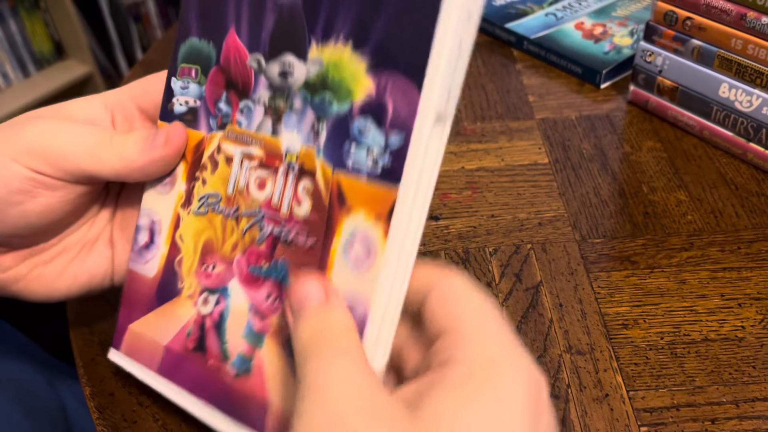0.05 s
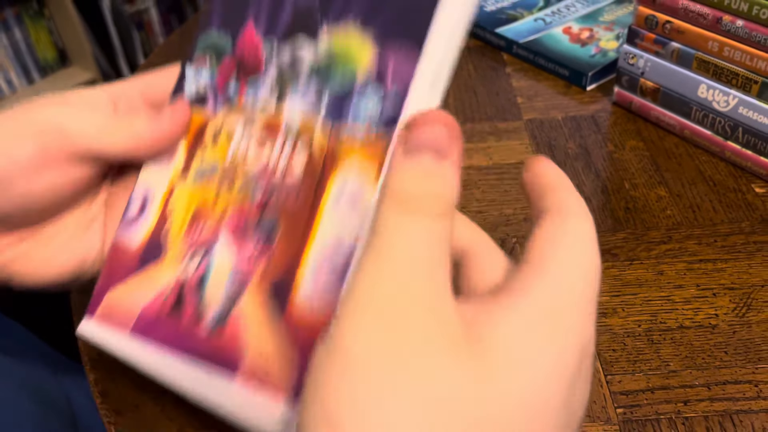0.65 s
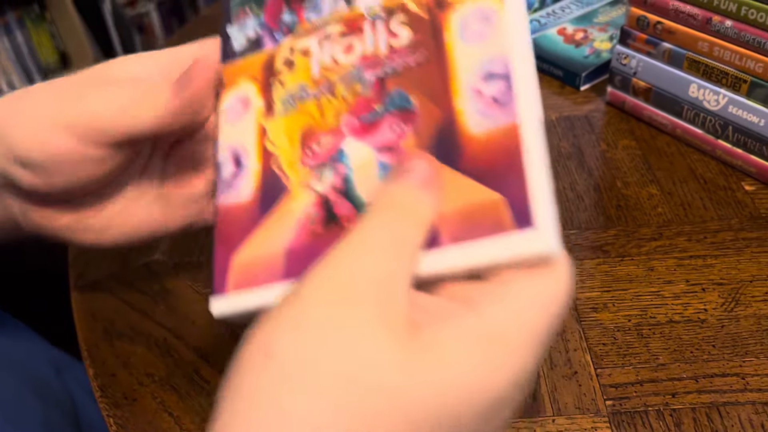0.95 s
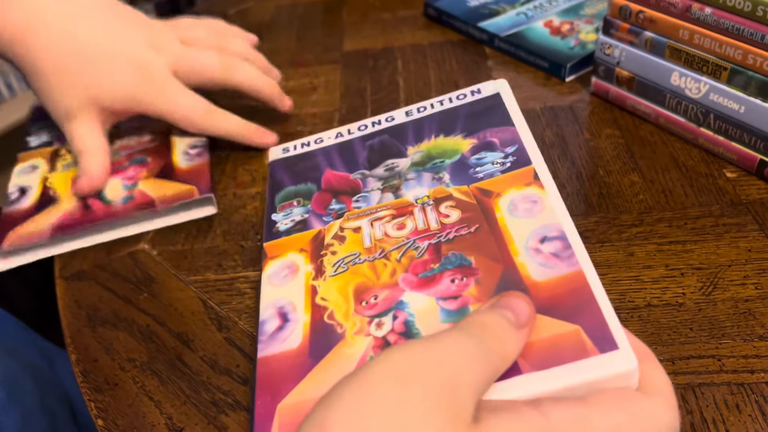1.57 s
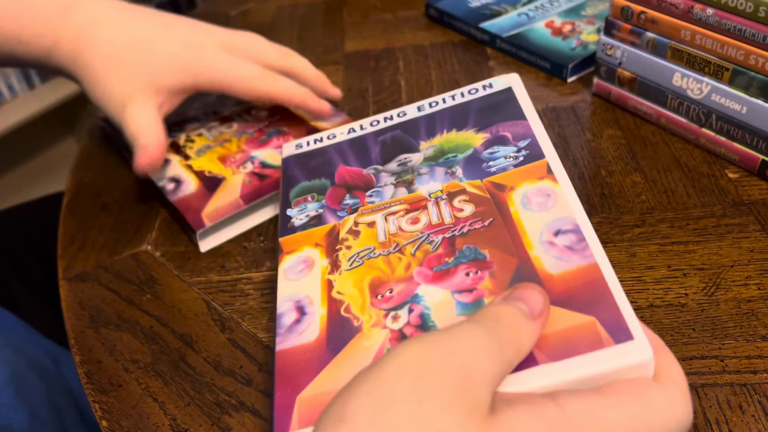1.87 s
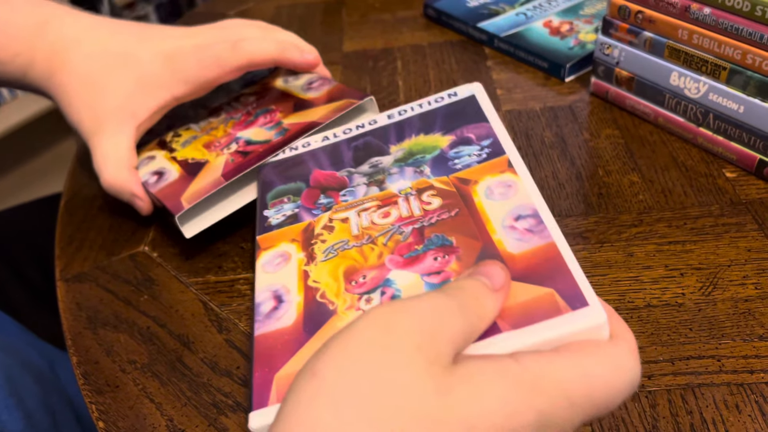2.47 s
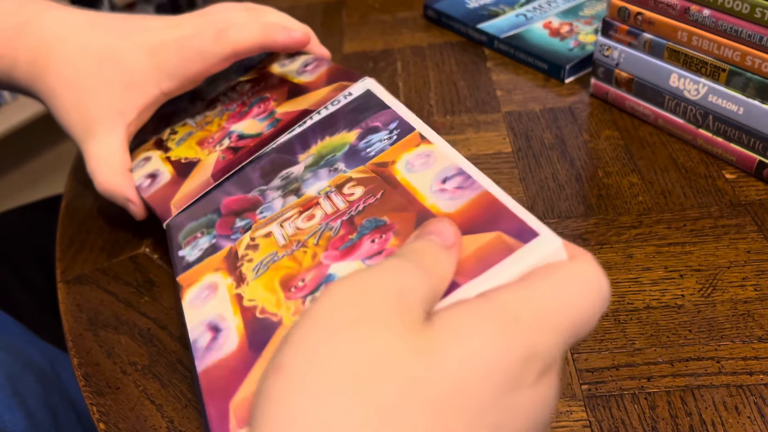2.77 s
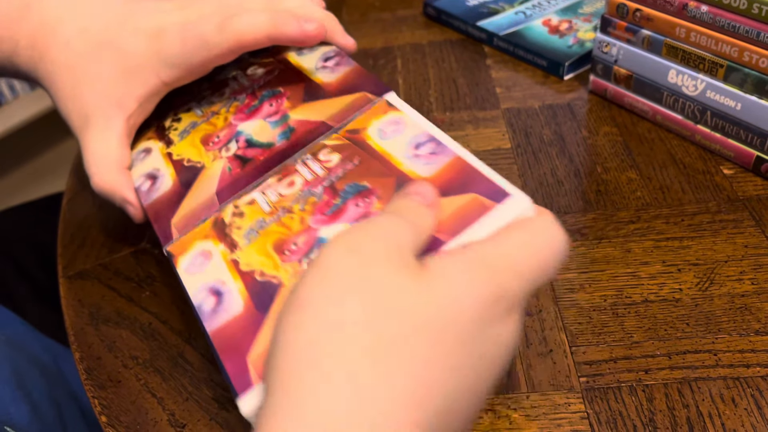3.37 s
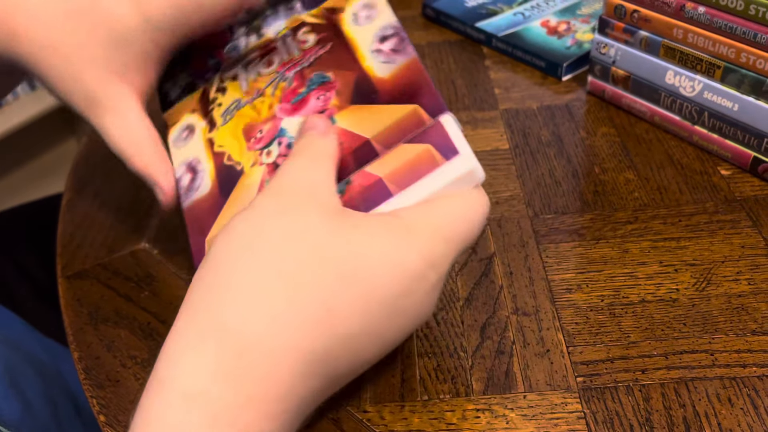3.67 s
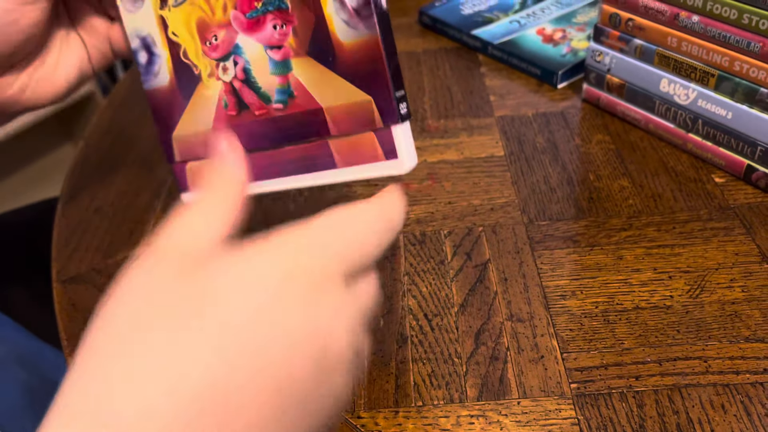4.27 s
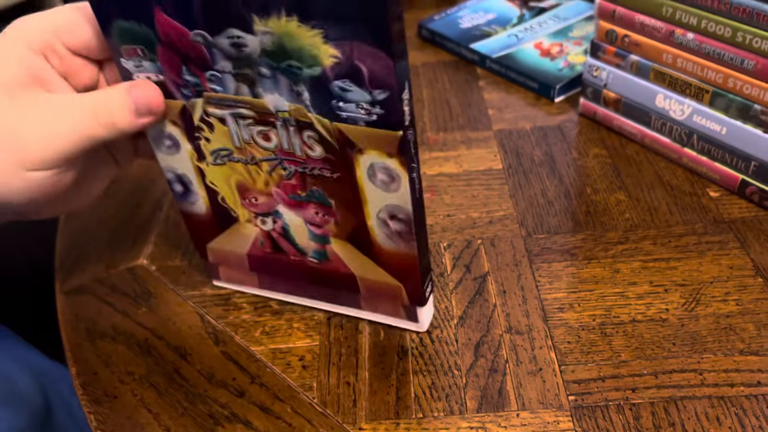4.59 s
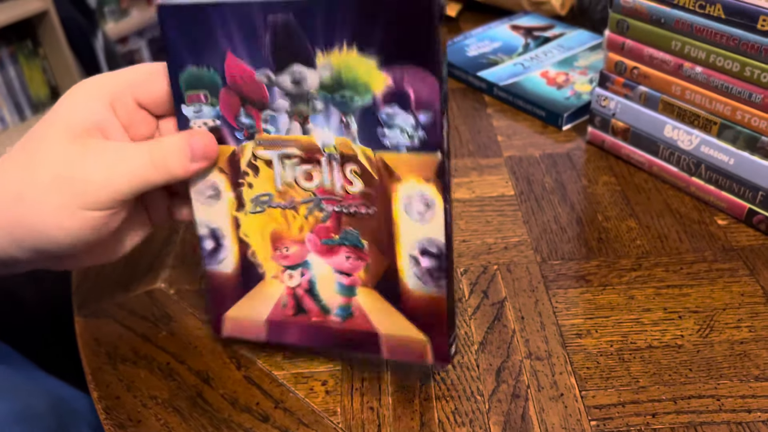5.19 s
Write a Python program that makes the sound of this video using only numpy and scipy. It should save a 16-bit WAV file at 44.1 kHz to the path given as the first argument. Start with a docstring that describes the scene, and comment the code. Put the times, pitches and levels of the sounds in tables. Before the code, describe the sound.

A plastic case snaps shut, is handled with light scrapes and squeaks, then another clacks onto a wooden table over a low hum.

```python
"""Two plastic disc cases are handled over a wooden table, close by, in a small humming room.
One snaps shut, the other is dragged across the wood; they rub and squeak on each other, then one is
knocked upright, slips and clacks into place. Impacts excite the damped modes of shells, edges and
table; sliding friction drives the shells with many tiny slips, and stick-slip oscillation squeaks.
Short reflections follow the handling, over the hum and air flow of fan motors."""
import sys
import numpy as np
from scipy import signal
from scipy.fft import rfft, irfft, next_fast_len
from scipy.io import wavfile
from scipy.ndimage import uniform_filter1d, map_coordinates

SR = 44100
rng = np.random.default_rng(int(sys.argv[2]) if len(sys.argv) > 2 else 0)


def store_pcm(level_fs):
    """Save levels as 16-bit WAV."""
    pcm = np.round(np.clip(level_fs, -1, 1) * 32767).astype(np.int16)
    wavfile.write(sys.argv[1], SR, np.atleast_2d(pcm).T)


N = 239621
T = np.arange(N) / SR
HIT_SIZE = 8192  # samples in one short event
LEFT_RIGHT = np.array([[1], [-1]])

# modes of the first case's stiff edge, in blows and taps: f/Hz, bandwidth/Hz, gain/dB
FIRST_EDGE_MODES = [(2980, 830, 3), (3940, 520, 0), (5040, 440, -15), (5800, 870, -5.5), (8000, 550, 3),
                    (8200, 440, -6.5), (11500, 1900, -21.5), (15100, 2000, 4.5)]
# modes of the rubbed case wall: f/Hz, bandwidth/Hz, gain/dB
WALL_MODES = [(870, 330, -13.5), (1400, 850, -13.5), (1670, 260, 5), (2000, 160, 6), (2270, 240, -7),
              (2535, 73, 3), (3300, 560, -22)]


def undb(db):
    """Amplitude ratio of a level in decibels."""
    return 10 ** (np.asarray(db) / 20)


def unit(x):
    """Normalisation to rms 1."""
    return x / np.sqrt(np.mean(x ** 2))


def peak(x, db):
    """Normalisation to a peak level."""
    return x * undb(db) / np.abs(x).max()


def freqs(size):
    """Bin frequencies of a Fourier transform, kept above zero."""
    return np.maximum(np.fft.rfftfreq(size, 1 / SR), 1)


def along(f, hz, values):
    """Linear interpolation on a log-frequency axis."""
    return np.interp(np.log(f), np.log(hz), values)


def colour(x, points):
    """Zero-phase filtering by a curve of (f/Hz, gain/dB) points."""
    size = x.shape[-1]
    return irfft(rfft(x) * undb(along(freqs(size), *np.transpose(points))), size)


def ring(x, modes):
    """Modal superposition: x drives damped resonators (f/Hz, bandwidth/Hz, gain/dB)."""
    size = x.shape[-1]
    f = freqs(size)
    response = sum(undb(db) / (1 + 1j * (f * f - hz * hz) / (f * width)) for hz, width, db in modes)
    return irfft(rfft(x) * response, size)


def walk(rate, size):
    """Smooth random drift with a spread near 1 and `rate` new values a second."""
    step = max(int(SR / rate), 1)
    stairs = np.repeat(rng.standard_normal(size // step + 1), step)
    return 1.2 * uniform_filter1d(stairs, step)[:size]


def widen(mid, side, side_curve):
    """Sum and difference stereo; the difference has its own spectrum."""
    return mid + LEFT_RIGHT * colour(side, side_curve)


def pan(db):
    """Channel gains for a level difference, left minus right."""
    return undb(LEFT_RIGHT * db / 2)


def add(out, s, sound):
    """Superposition of a sound beginning at s seconds."""
    i = max(int(s * SR), 0)
    out[:, i:i + sound.shape[-1]] += sound[..., :N - i]


def fans(air_db=-45, whistle_db=-73, waver_db=0.73, drift_hz=0.44):
    """Fan motors give a line spectrum over the continuous spectrum of flowing air."""
    # moving air: f/Hz, gain/dB
    air_spectrum = [(25, -19), (55, 0.5), (85, -2), (150, 0.5), (275, 2), (360, -11.5), (500, -13),
                    (800, -18.5), (1650, -18.5), (2900, -37.5), (4000, -46.5), (5600, -64), (9000, -62.5),
                    (16000, -83)]
    # whistles in the flow: f/Hz, bandwidth/Hz, gain/dB
    whistle_modes = [(3670, 910, 2), (4495, 75, 6), (7070, 720, 3.5)]
    # motor and mains hum: f/Hz, rms level/dB
    hum_lines = [(59.5, -96), (139.5, -52), (180.3, -55), (240, -47.5), (253.5, -53), (267.5, -49.5),
                 (360.5, -67.5), (468, -68), (535, -91.5)]
    flow = colour(rng.standard_normal((2, N)), air_spectrum)
    whistle = ring(rng.standard_normal((2, N)), whistle_modes)
    whistle = colour(whistle, [(1500, -7.5), (3500, 12.5), (7500, -3.0), (11000, -15.5)])
    mid, side = undb(air_db) * unit(flow) + undb(whistle_db) * unit(whistle)
    air = widen(mid, side, [(60, -16.5), (250, -8.0), (500, -5.0), (1200, 0.5), (5000, -0.5)])
    hum = 0
    for hz, db in hum_lines:
        phase = 2 * np.pi * (np.cumsum(hz + drift_hz * walk(2.924, N)) / SR + rng.random())
        hum = hum + np.sqrt(2) * undb(db + waver_db * walk(3.7, N)) * np.sin(phase)
    return (air + hum) * pan(db=1)


def friction(hiss, rasp, modes, slips_per_s, scatter_db, uneven_db, side_db, drift):
    """Friction as shot noise: tiny slips hiss at the surface and excite a rasp in the shell's modes."""
    # hiss of the sliding surfaces: f/Hz, gain/dB
    hiss_spectrum = [(700, 4), (1500, 2.5), (2800, 8), (4500, -1), (6500, -2), (8500, -2), (10500, -24),
                     (13000, -42), (15300, 3.5), (17000, -27)]
    size = next_fast_len(N, True)
    slips = (rng.random((4, size)) < slips_per_s / SR) * rng.standard_normal((4, size))
    strength_db = scatter_db * np.minimum(rng.exponential(size=(4, size)), 4)
    slips = slips * undb(strength_db + uneven_db * walk(160, size))
    surface = unit(colour(slips[:2], hiss_spectrum))[:, :N]
    wall = colour(ring(slips[2:], modes), [(300, -19), (800, 3.0), (4700, -4.5), (9000, -22.5)])
    # the resonances wander as the contact moves
    warped_index = np.cumsum(1 + drift * walk(25, N))
    wall = np.array([map_coordinates(w, [warped_index], order=2, mode="mirror") for w in wall])
    mid, side = hiss * surface + rasp * unit(wall)
    return mid + LEFT_RIGHT * undb(side_db) * side


def rub(grip_hiss_db=-79, grip_rasp_db=-66, wander_db=1.8, press_db=7, rise_share=0.37, stop_s=.021):
    """Friction of shifting fingers and brief rubs: noise grows with speed, rasp also with pressure."""
    # short rasping tail of the snap, then brief rubs of case on case:
    # t/s, duration/s, hiss level/dB, rasp reference level/dB
    rasps = [(0.38, 0.047, -57, -44), (0.834, 0.11, -71.5, -57), (2.51, 0.068, -73, -51),
             (2.558, 0.079, -59, -45), (2.723, 0.045, -60, -43), (3.11, 0.16, -69, -53),
             (3.655, 0.061, -83, -57), (4.656, 0.12, -57, -40)]
    grip = undb(wander_db * walk(rate=3.9, size=N))
    hiss, rasp = undb(grip_hiss_db) * grip, undb(grip_rasp_db) * grip
    for s, length, hiss_db, rasp_db in rasps:
        age = T - s
        rise = np.clip(age / (rise_share * length), 0, 1) ** 2
        speed = rise * np.exp(-np.maximum(age - length, 0) / stop_s)
        pressure = np.clip(age / length, 0, 1)
        hiss = np.hypot(hiss, speed * undb(hiss_db))  # incoherent sources add in power
        rasp = np.hypot(rasp, speed * undb(rasp_db - press_db * (1.5 - pressure)))
    return friction(hiss, rasp, WALL_MODES,
                    slips_per_s=7400, scatter_db=2.3, uneven_db=1.5, side_db=-1.5, drift=.04)


def taps(side_db=-7, crackle_db=4):
    """Transient excitation: a glancing touch is a crackling noise burst that rings cover and edge."""
    # touches of fingers and edges: t/s, brush time/s, shell level/dB, tick level/dB, low-pass f/Hz
    touches = [(0.039, 0.0023, -37, -60, 2600), (0.594, 0.0034, -51, -39, 2600),
               (0.715, 0.0017, -37.5, -68, 1400), (0.881, .003, -36, -70, 1500),
               (0.932, 0.0014, -42, -36.5, 3000), (.949, .003, -43, -72, 1200),
               (1.005, 0.0054, -39, -39, 2200), (1.042, .0025, -33, -71, 1500),
               (1.094, 0.0043, -38.5, -68, 2000), (1.230, .002, -35, -74, 900),
               (1.246, 0.0051, -30, -66, 1100), (1.511, 0.0023, -47, -41, 2600),
               (1.581, .0015, -39.5, -46, 3000), (2.6492, 0.0011, -20, -35, 2600),
               (2.663, 0.0027, -27, -42, 2600), (3.681, .0022, -38, -58, 2600),
               (4.165, 0.0018, -60, -43.5, 2600), (5.208, 0.0029, -39, -68, 2600)]
    # modes of the lightly touched cover: f/Hz, bandwidth/Hz, gain/dB
    cover_modes = [(704, 200, -7), (1110, 88, 8), (1320, 420, 9), (1710, 140, 3.5), (2600, 220, 0),
                   (3150, 250, -27)]
    out, t = np.zeros((2, N)), np.arange(HIT_SIZE) / SR
    for s, brush_s, shell_db, tick_db, soft_hz in touches:
        envelope = undb(crackle_db * walk(700, HIT_SIZE)) * t * np.exp(-t / brush_s)
        mid, side = rng.standard_normal((2, HIT_SIZE)) * envelope
        scuff = mid + LEFT_RIGHT * undb(side_db) * side
        touch = peak(ring(scuff, cover_modes), shell_db) + peak(ring(scuff, FIRST_EDGE_MODES), tick_db)
        softness = signal.butter(1, soft_hz, fs=SR, output="sos")
        add(out, s, signal.sosfilt(softness, touch) * (1 - t / t[-1]))
    return out


def disperse(x, corner_hz=1300):
    """Dispersion of bending waves, as an all-pass filter: low frequencies arrive after high ones."""
    _, poles = signal.butter(4, corner_hz, fs=SR)
    return signal.lfilter(poles[::-1], poles, x)


def blow(shell_modes, edge_modes, shell_db, contact_hz, bass_hz, thump_db, tick_db, pan_db, lag_ms,
         pitch, contact_s=.001, chatter=0.1, tick_side=0.16, table_lag_s=0.00269):
    """Impact: a short force pulse sets shell and table in free vibration while the edges crack."""
    # slow flexural modes of the table: f/Hz, bandwidth/Hz, gain/dB
    table_modes = [(120, 29, -9), (180, 21, 5.5), (224, 47, 12), (376, 23, -7)]
    t = np.arange(HIT_SIZE) / SR
    noise = rng.standard_normal((4, HIT_SIZE))
    contact = np.exp(-t / contact_s)
    force = (t == 0) + chatter * noise[:2] * np.sqrt(contact)
    # a softer contact lasts longer and leaves the high modes quiet
    force = signal.sosfilt(signal.butter(2, contact_hz, fs=SR, output="sos"), force)
    shell = disperse(ring(force, np.array(shell_modes) * [pitch, 1, 1]))
    # a blow near a stiff edge moves less of the panel and radiates less bass
    shell = signal.sosfilt(signal.butter(2, bass_hz, "high", fs=SR, output="sos"), shell)
    crack = (noise[2] + tick_side * LEFT_RIGHT * noise[3]) * contact
    thump = np.roll(ring(force.mean(0), table_modes), int(table_lag_s * SR))
    sound = peak(shell, shell_db) + peak(thump, thump_db) + peak(ring(crack, edge_modes), tick_db)
    sound[1] = np.roll(sound[1], round(lag_ms * SR / 1000))
    fade = np.cos(np.pi / 2 * t / t[-1]) ** 2
    return sound * fade * pan(pan_db)


def snap_and_knocks():
    """Each struck case rings in its natural modes: one snaps shut, the other is stood on the table."""
    # the first case's catch closes at two points, the lid rattles, later an edge is knocked:
    # t/s, shell level/dB, contact low-pass f/Hz, bass cut f/Hz, thump level/dB, tick level/dB,
    # left minus right/dB, right lag/ms, shell frequency ratio
    snap = [ (0.3868, -6.5, 3300, 300, -33, -17.5, -2.5, .09, 1),
            (0.3882, -2.5, 3600, 300, -33, -11, -1, .09, 1),
            (0.3972, -34, 2200, 1500, -44, -43, 2, 0, 0.89),
            (0.3999, -17.5, 2000, 300, -36, -39, -9, .2, 1.4), (0.4060, -23, 1900, 400, -40, -41, 0, 0, .9),
            (0.9106, -26, 1500, 950, -48, -58, -4, 0.027, 1.16)]
    # the second case strikes the table and settles: same columns
    knocks = [ (4.5530, -0.3, 1930, 250, -12, -28, -4, 0.077, 0.96),
              (4.716, -27, 1300, 702, -38, -59, -2, 0, 1),
              (4.7341, -22, 5970, 1500, -33, -10.5, -6.5, 0, 1.4),
              (4.7365, -11.5, 2200, 500, -22.5, -11, 2, .02, 1.1),
              (4.778, -3.5, 1850, 1320, -28.5, -34, -4, .08, 1.06),
              (4.7915, -31, 1600, 1500, -40, -55, -1, 0, 1.3),
              (4.7985, -23, 1200, 800, -47, -57, -2, 0, 1.12)]
    # modes of the two hollow shells and the second case's stiff edge: f/Hz, bandwidth/Hz, gain/dB
    first_shell = [(250, 78, -10), (420, 120, -13), (580, 210, -1.5), (820, 250, 4), (1370, 240, 0.5),
                   (1864, 240, 4.5), (2220, 290, 0.5), (2800, 350, -21.5), (4100, 700, -9),
                   (5800, 1200, -25)]
    second_shell = [(524, 120, -10), (733, 94, 4.5), (807, 130, 0.5), (980, 190, -4.5), (1200, 130, -11),
                    (1400, 94, -9.5), (1843, 120, -8), (2230, 170, -12.5), (2935, 250, -28),
                    (3570, 320, -26.5), (4500, 600, -19.5)]
    second_edge = [(2730, 560, 1.5), (3670, 810, 5.5), (5070, 600, -17), (5780, 420, 3.5),
                   (6940, 530, -7.5), (7950, 420, -3), (8950, 320, -27), (11630, 1400, -34),
                   (15500, 2300, 0.5)]
    out = np.zeros((2, N))
    for s, *stroke in snap:
        add(out, s, blow(first_shell, FIRST_EDGE_MODES, *stroke))
    for s, *stroke in knocks:
        add(out, s, blow(second_shell, second_edge, *stroke))
    return out


def motion(curve):
    """Amplitude envelope through (t/s, level/dB) points, at rest before and after."""
    return undb(np.interp(T, *np.transpose(curve), left=-200, right=-200))


def drag(hiss_db=5.5, rasp_db=8):
    """Sliding friction on wood: a case lying flat catches on the grain, which excites its modes."""
    # speed of three shoves, as loudness: t/s, level/dB
    shoves = [(1.27, -78), (1.31, -69), (1.34, -57), (1.377, -69.5), (1.395, -61.5), (1.46, -65),
              (1.52, -68), (1.59, -70.5), (1.635, -81), (1.69, -68.5), (1.735, -66), (1.79, -71.5),
              (1.93, -83)]
    # modes of the second case lying flat: f/Hz, bandwidth/Hz, gain/dB
    flat_modes = [(1020, 140, -21), (1340, 230, 5), (1600, 250, -7), (2620, 210, 4.5), (3050, 220, -6),
                  (3780, 170, -5), (4530, 280, 2), (6200, 400, 3)]
    speed = motion(shoves)
    return friction(speed * undb(hiss_db), speed * undb(rasp_db), flat_modes,
                    slips_per_s=2200, scatter_db=1.0, uneven_db=2.5, side_db=-3, drift=.06)


def squeaks(overtone_db=-19, grit_hz=2900, grit_width_hz=1600, grit_per_roughness=2.03):
    """Stick-slip oscillation locks briefly onto a wall resonance; missed slips make it gritty."""
    # plastic squeaking on plastic or wood: t/s, duration/s, f/Hz, level/dB, roughness share
    chirps = [(1.297, .006, 3900, -54, 0.067), (1.318, .009, 2450, -54, 0.16),
              (1.347, .008, 3900, -53, 0.16), (1.399, 0.01, 2600, -56, 0.07),
              (1.437, 0.014, 4550, -54, 0.037), (1.449, 0.007, 3650, -51, 0.067),
              (1.508, 0.012, 6100, -53.5, .03), (2.648, 0.0094, 2030, -25, 0.049),
              (2.735, 0.041, 2080, -46.5, 0.106), (2.757, 0.0072, 2080, -33.5, 0.031),
              (2.768, 0.0075, 2060, -36, 0.035), (2.774, 0.0064, 2250, -41, .07)]
    out = np.zeros((2, N))
    for s, length, hz, db, roughness in chirps:
        size = int(length * SR)
        pitch_hz = hz * (1 + roughness * walk(1800, HIT_SIZE)[:size])
        phase = 2 * np.pi * np.cumsum(pitch_hz) / SR
        grit = unit(ring(rng.standard_normal((2, HIT_SIZE)), [(grit_hz, grit_width_hz, 0)]))[:, :size]
        tone = np.sin(phase) + undb(overtone_db) * np.sin(2 * phase)
        envelope = undb(db) * signal.windows.tukey(size, .7)
        add(out, s, (tone + grit_per_roughness * roughness * grit) * envelope * pan(db=-3))
    return out


def bumps():
    """Low-frequency flexure: a soft push makes the table swing for a few cycles."""
    # hand and case against the table: t/s, duration/s, f/Hz, peak level/dB
    nudges = [(3.135, 0.058, 64.8, -30), (3.198, 0.041, 99, -28.5)]
    out = np.zeros((2, N))
    for s, length, hz, db in nudges:
        t = np.arange(int(length * SR)) / SR
        add(out, s, undb(db) * np.sin(np.pi * t / length) * np.sin(2 * np.pi * hz * t))
    return out


def slide(hiss_db=6.5, midway_rasp_db=12, press_db_per_s=36.5):
    """Friction under a growing load: one case slides along the other, bright at first, then raspier."""
    # speed of the long slide, as loudness: t/s, level/dB
    stroke = [(3.2, -83), (3.27, -67), (3.34, -59), (3.45, -61.5), (3.58, -63), (3.61, -76), (3.65, -87)]
    speed = motion(stroke)
    start, end = stroke[0][0], stroke[-1][0]
    press_db = press_db_per_s * (np.clip(T, start, end) - (start + end) / 2)
    return friction(speed * undb(hiss_db), speed * undb(midway_rasp_db + press_db), WALL_MODES,
                    slips_per_s=2300, scatter_db=1.5, uneven_db=1.5, side_db=-3, drift=.025)


def room(x, first_s=0.0045, build_s=0.002):
    """Reverberation: diffuse reflections build within milliseconds, then decay exponentially."""
    # bands of the furnished room: f/Hz, T60/s, gain/dB
    bands = [(125, 0.1, -1), (250, 0.077, -6.5), (500, 0.13, -6), (1000, 0.22, -15.5), (1995, 0.18, -15.5),
             (4000, 0.13, -14), (8000, 0.18, -13.5), (14100, 0.13, -25)]
    size = SR // 2
    t, f = np.arange(size) / SR, freqs(size)
    mid, side = rng.standard_normal((2, size))
    spectrum = rfft(widen(mid, side, [(200, -12.0), (600, -11.5), (1500, -2)]))
    swell = np.clip((t - first_s) / build_s, 0, 1)
    tail = 0
    for share, (_, t60, db) in zip(np.eye(len(bands)), bands):
        fade = swell * undb(-60 * t / t60)
        band = irfft(spectrum * along(f, np.array(bands)[:, 0], share), size)
        tail = tail + undb(db) * band * fade / np.linalg.norm(fade)
    return signal.fftconvolve(x, tail, axes=1)[:, :N]


def scene():
    """Superposition of the handling, its reflections, the table's bumps and the fans."""
    handling = snap_and_knocks() + taps() + drag() + slide() + rub() + squeaks()
    return handling + room(handling) + bumps() + fans()


def record(dry):
    """Soft saturation rounds the highest peaks; a steep low-pass limits the bandwidth."""
    ceiling, top_hz = .95, 16350
    rounded = dry / (1 + (dry / ceiling) ** 8) ** (1 / 8)
    return signal.sosfilt(signal.ellip(8, .2, 70, top_hz, fs=SR, output="sos"), rounded)


dry = scene()
out = record(dry)
store_pcm(out)
```